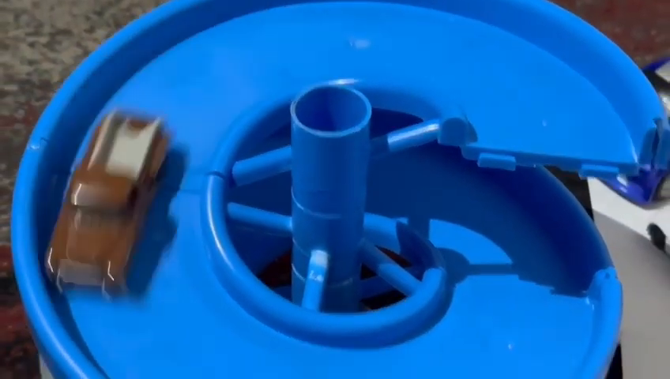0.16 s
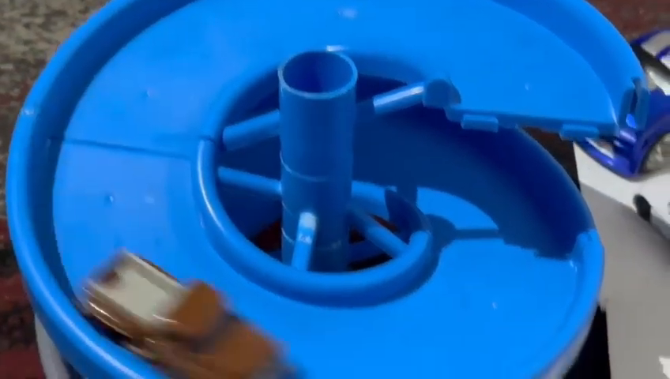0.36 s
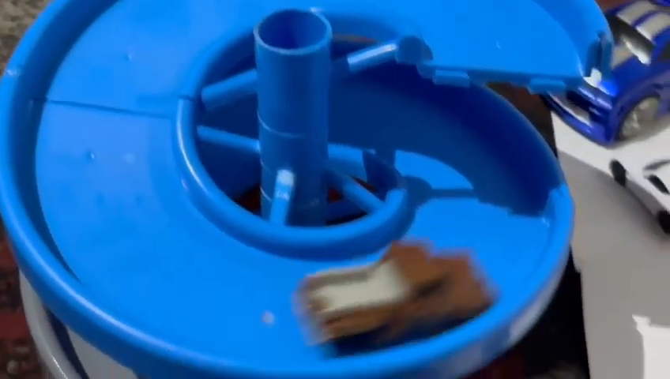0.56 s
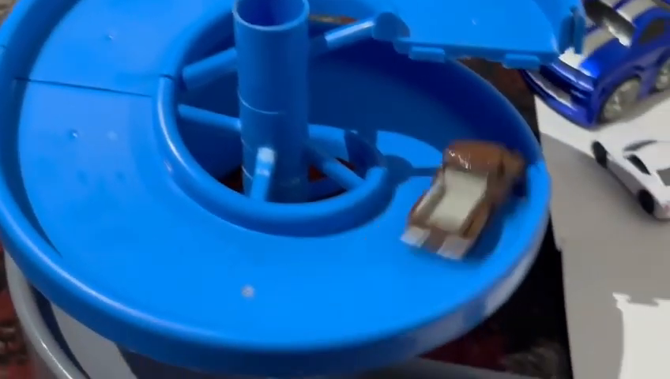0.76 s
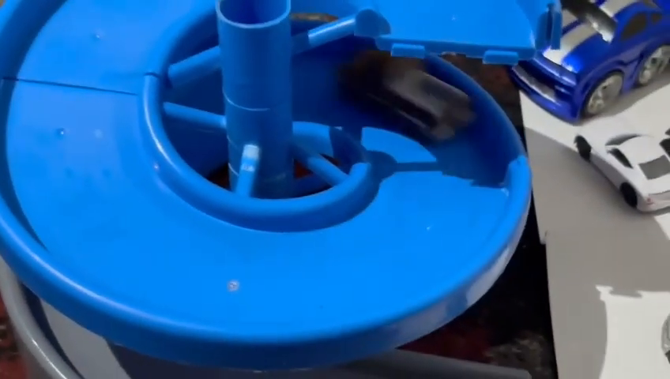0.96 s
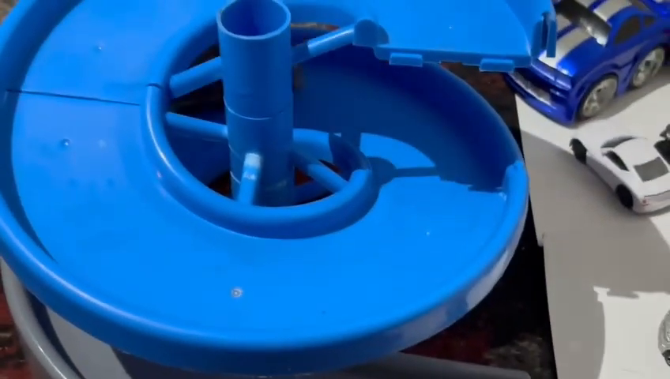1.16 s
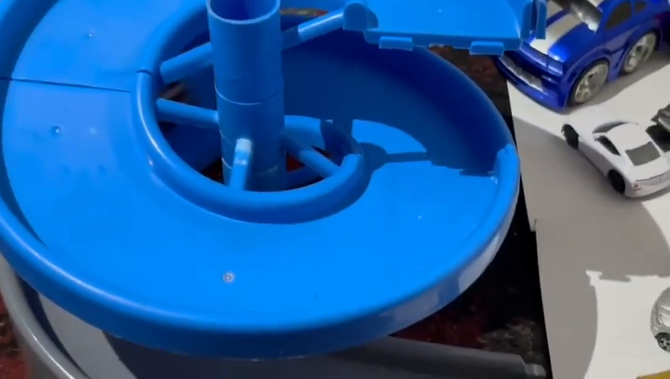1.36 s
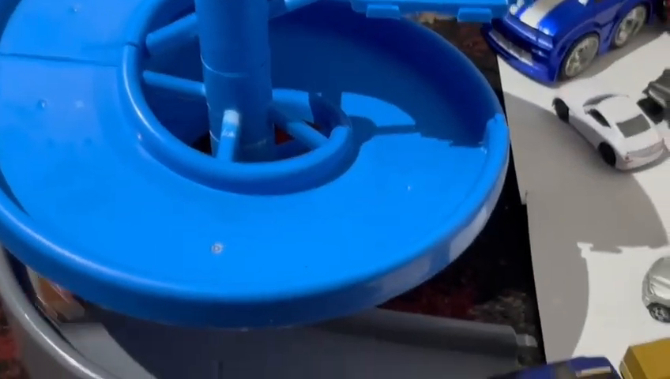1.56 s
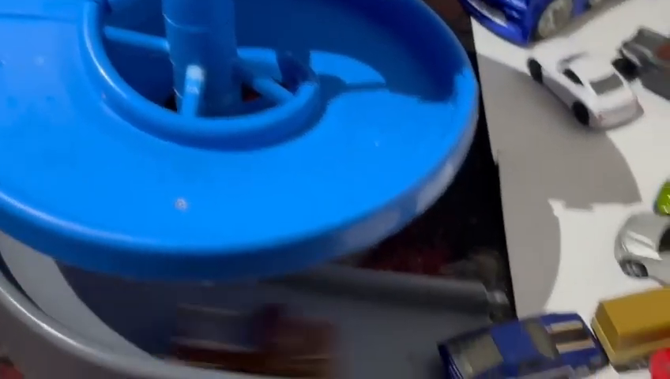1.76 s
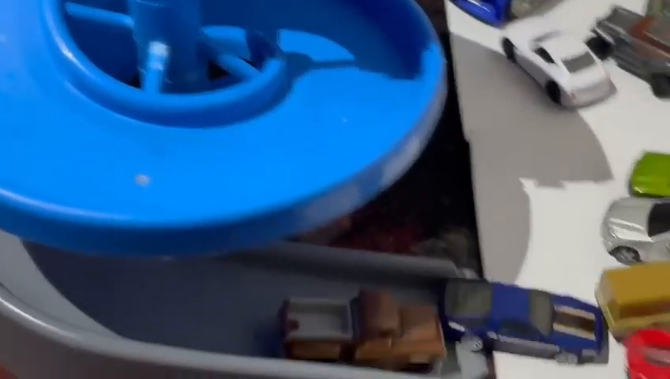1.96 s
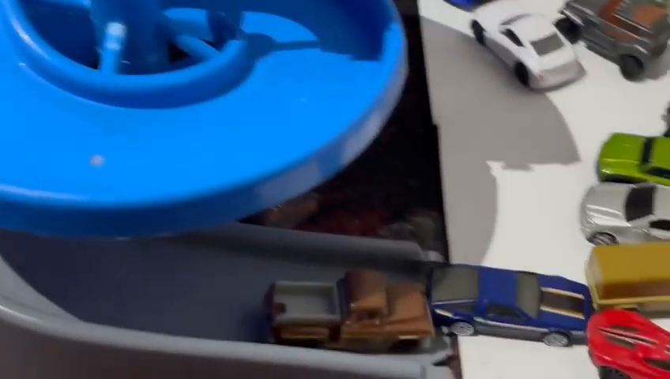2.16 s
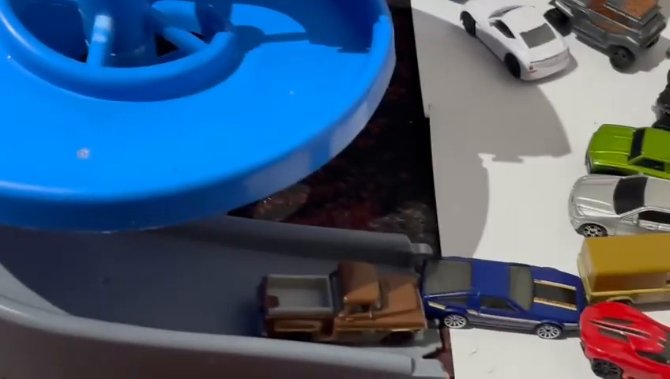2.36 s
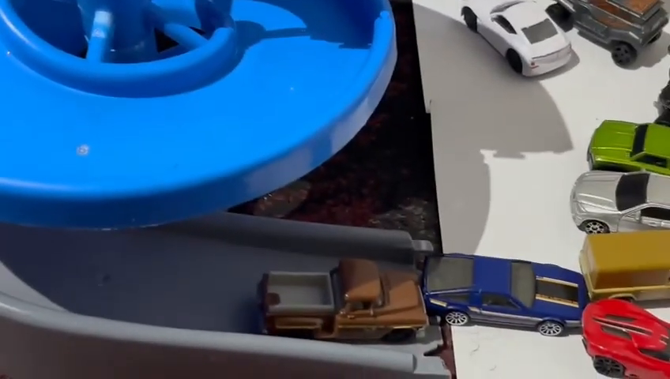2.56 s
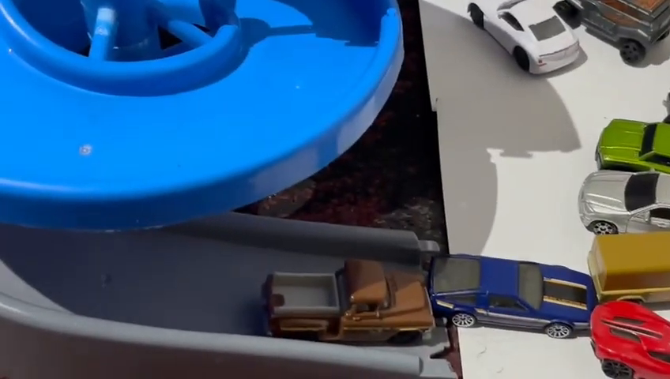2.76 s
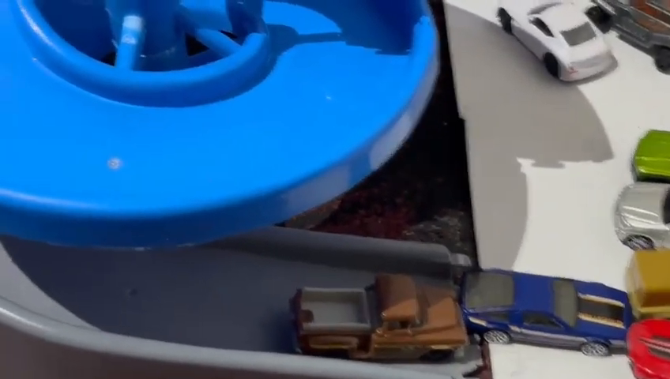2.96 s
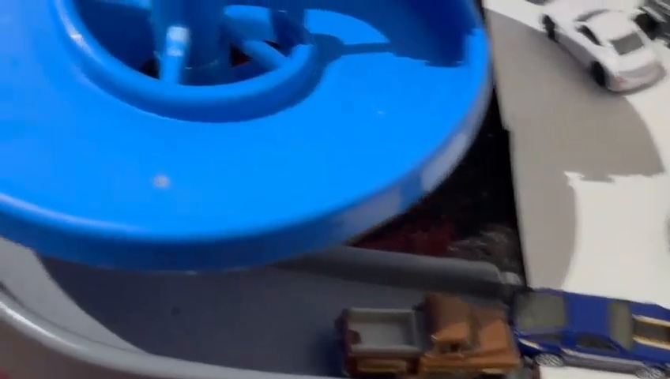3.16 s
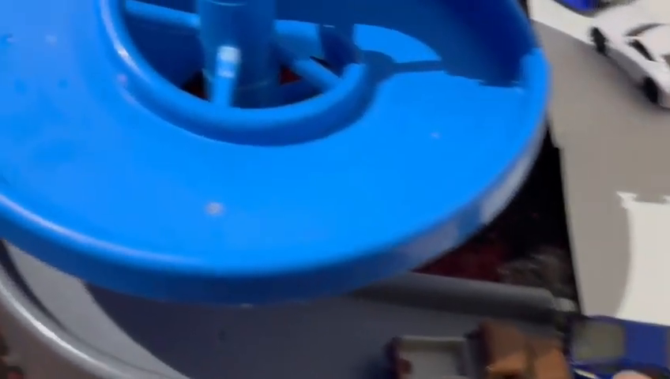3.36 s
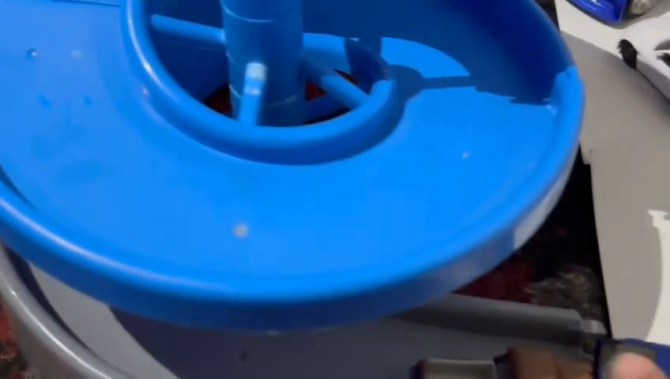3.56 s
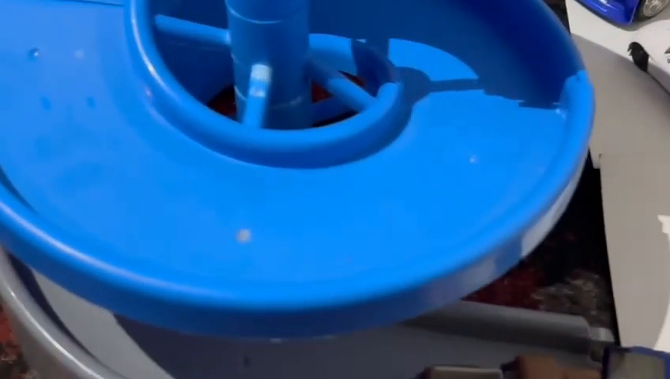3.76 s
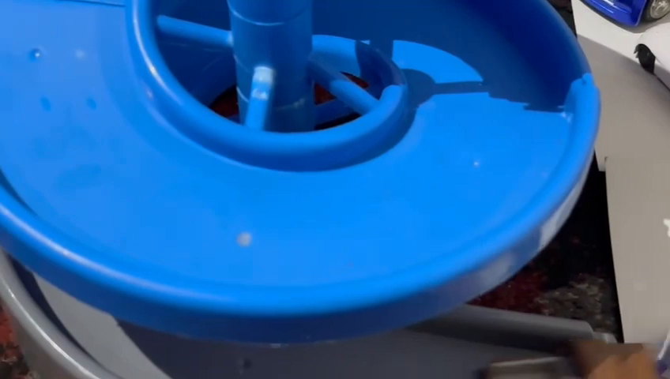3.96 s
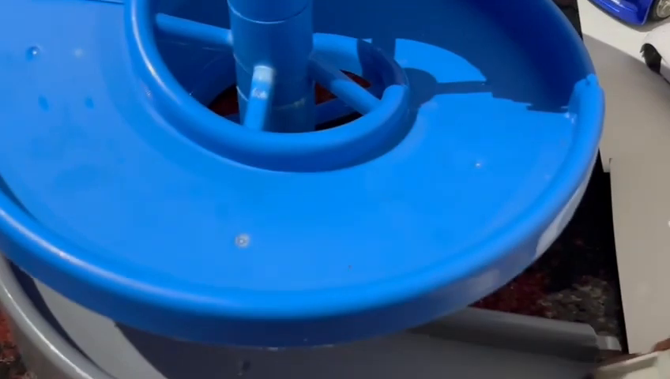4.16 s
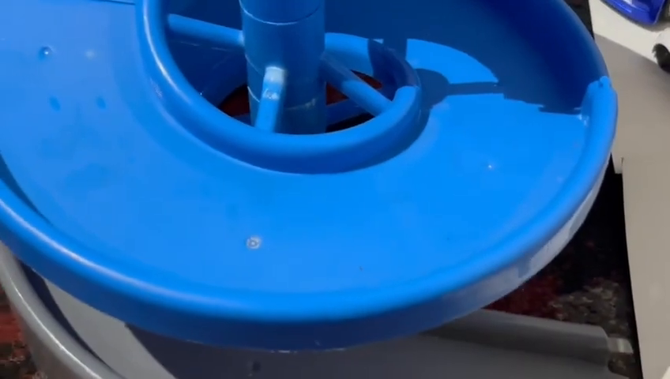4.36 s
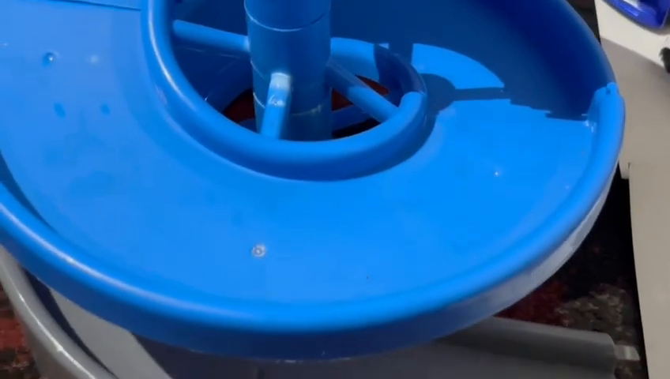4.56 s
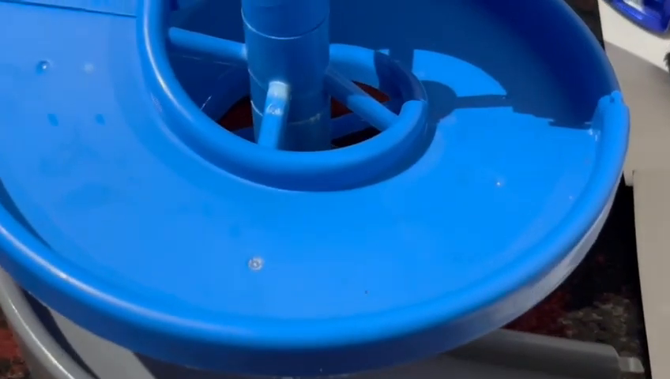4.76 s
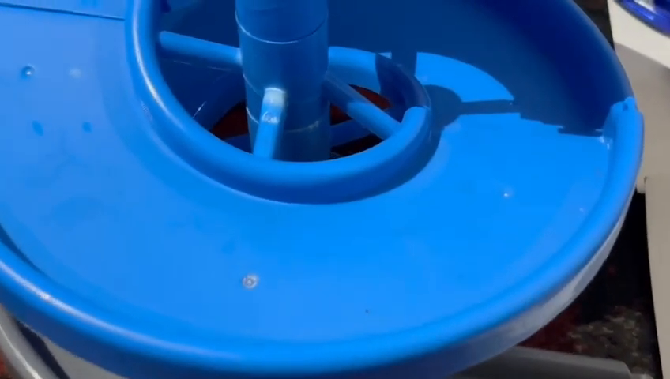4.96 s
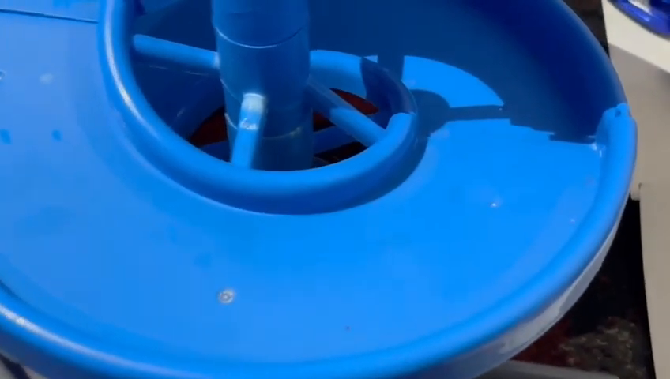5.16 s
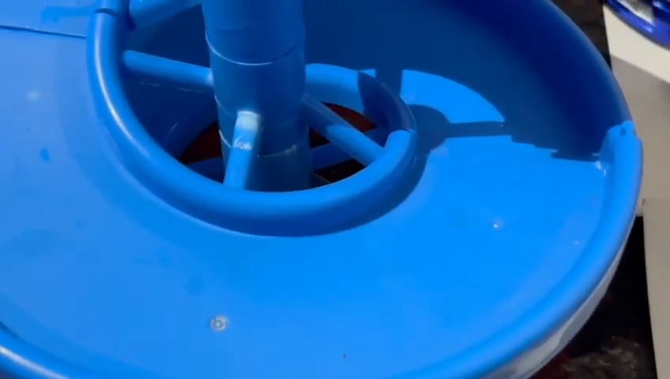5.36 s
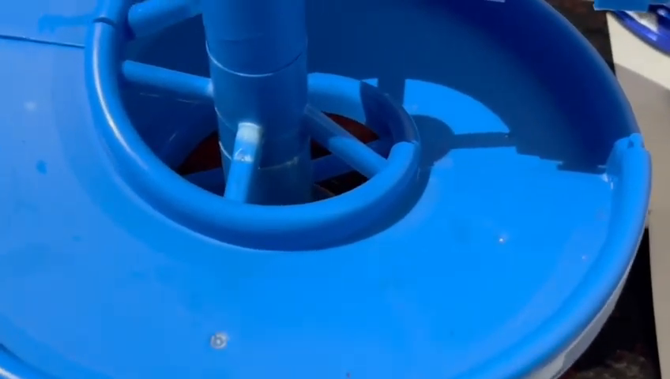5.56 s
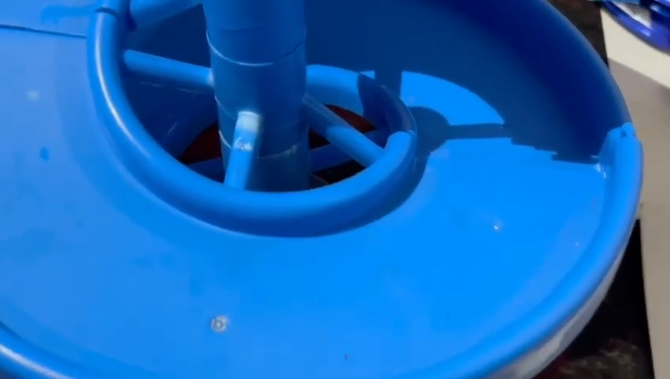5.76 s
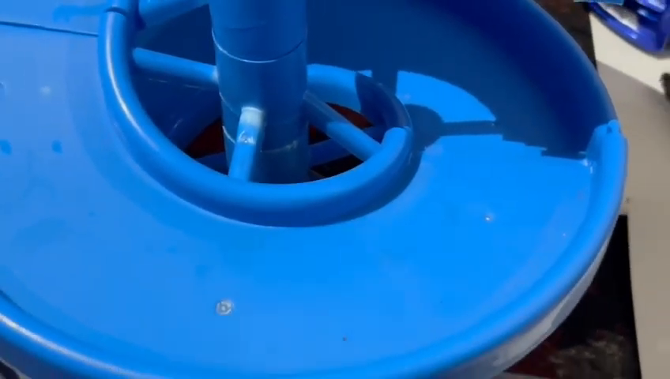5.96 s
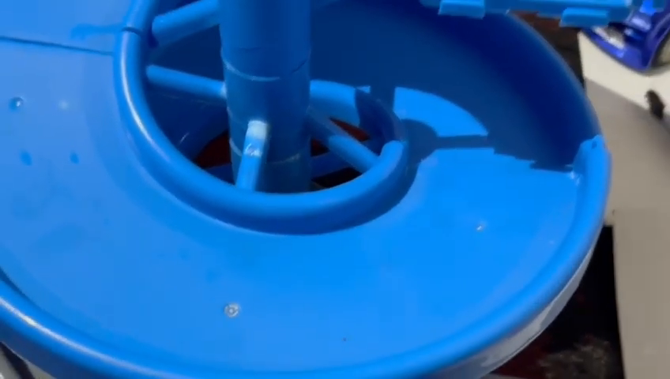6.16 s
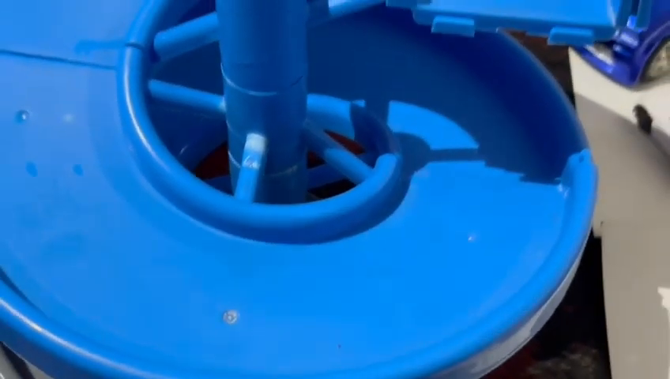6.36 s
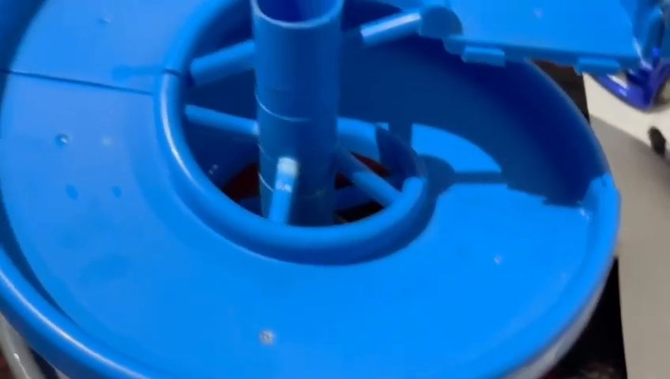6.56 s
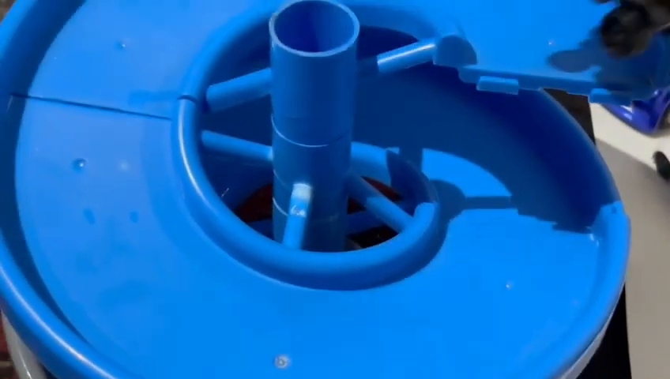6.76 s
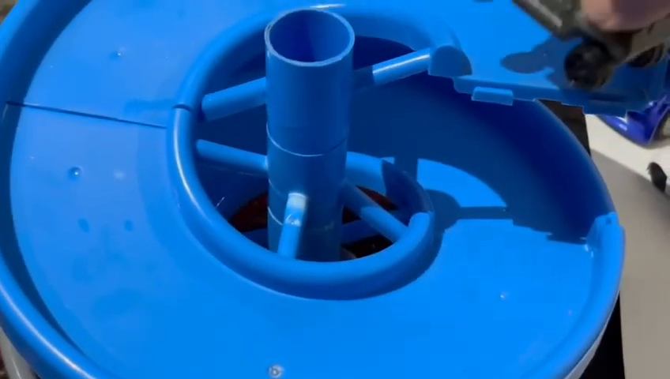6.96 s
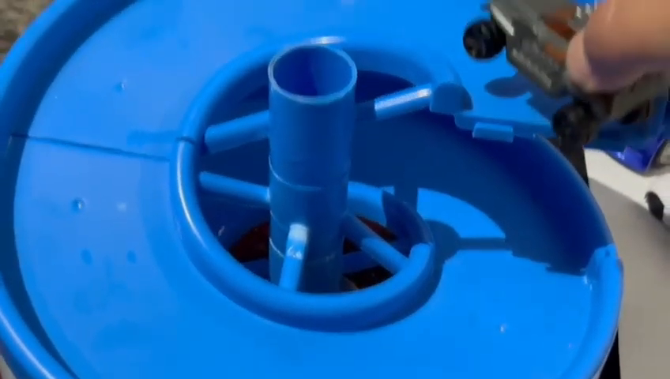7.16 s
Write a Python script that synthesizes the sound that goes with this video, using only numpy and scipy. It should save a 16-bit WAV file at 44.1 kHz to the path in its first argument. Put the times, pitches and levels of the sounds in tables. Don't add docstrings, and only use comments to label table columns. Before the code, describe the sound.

A small metal car is already rolling down a hollow plastic spiral, its wheels gritty and axles rattling, with boxy thumps at seams. It speeds up and hits parked cars with one loud crack, then settles. After quiet with faint sleeve rustle, a hand drags it away clattering, and later clinks other cars. Close microphones, quiet carpeted room.

```python
import sys
import numpy as np
from scipy import signal
from scipy.fft import rfft, irfft
from scipy.io import wavfile
from scipy.ndimage import uniform_filter1d

SR = 44100
rng = np.random.default_rng(int(sys.argv[2]) if len(sys.argv) > 2 else 0)


def volts(x):
    e = np.asarray(x, float) / 20
    return 10 ** e


def generate_wav(sig):
    pcm = np.round(np.clip(np.atleast_2d(sig).T, -1, 1) * 32767).astype(np.int16)
    wavfile.write(sys.argv[1], SR, pcm)


N = 321930


def evened(x):
    return x / np.sqrt(np.mean(x ** 2) + 1e-20)


def peaked(x):
    return x / abs(x).max()


def butter(x, order, hz, kind):
    return signal.sosfilt(signal.butter(order, hz, kind, fs=SR, output="sos"), x)


def read(points, hz):
    f, value = np.transpose(points)
    return np.interp(np.log(hz + 1), np.log(f + 1), value)


def add(mix, s, sound):
    part = mix[round(s * SR):][:len(sound)]
    part += sound[:len(part)]


def causal(points):
    db = read(points, abs(np.fft.fftfreq(4096, 1 / SR)))
    log_gain = np.log(volts(np.maximum(db, -100)))
    return np.fft.ifft(np.exp(np.conj(signal.hilbert(log_gain)))).real[:2048]


def colored(x, points):
    return signal.oaconvolve(x, causal(points))[:N]


def resonate(x, hz, width):
    r, w = np.exp(-np.pi * width / SR), 2 * np.pi * hz / SR
    gain = (1 - r) * np.sqrt(1 - 2 * r * np.cos(2 * w) + r * r)
    return signal.lfilter([gain], [1, -2 * r * np.cos(w), r * r], x)


def body(x, modes):
    return evened(sum(volts(db) * resonate(resonate(x, hz, width), hz, width) for hz, width, db in modes))


def grit(per_s, spread_db, smooth):
    size = volts(spread_db * np.minimum(rng.exponential(1, N), 3.5)) * (rng.random(N) < per_s / SR)
    noise = rng.standard_normal((2, N))
    return evened(size * np.sign(noise[0])) + smooth * noise[1]


def patchy(x, patch_db):
    z = signal.stft(x, SR, nperseg=512)[2]
    field = uniform_filter1d(rng.standard_normal(z.shape), size=8, axis=0)
    field = uniform_filter1d(field, size=9, axis=1)
    return evened(signal.istft(z * volts(patch_db * evened(field)), SR, nperseg=512)[1][:N])


# frequency in Hz, level in dB per Hz.
HUM = [(20, -26.5), (38, -7.5), (60, 2), (95, -2), (150, -17.5), (300, -13), (623, -24.5), (1600, -33),
       (5170, -52), (8300, -52), (10000, -67.5), (13300, -70)]


def room_tone():
    hz = np.fft.rfftfreq(N, 1 / SR)
    return volts(-67.5) * evened(irfft(rfft(rng.standard_normal(N)) * volts(read(HUM, hz)), N))


def columns(tables):
    t = np.arange(N) / SR
    s, *values = np.concatenate(tables).T
    on = sum((t >= rows[0][0]) & (t <= rows[-1][0]) for rows in tables)
    return uniform_filter1d(on * 1., size=1323, mode="nearest"), [np.interp(t, s, v) for v in values]


# time in seconds, force in dB, weight on the ramp in dB.
RUN_DOWN = [
    (0.0, -35, 0),
    (0.15, -37, -6),
    (0.33, -38, -1.5),
    (0.53, -42, 0),
    (0.714, -38, -4),
    (0.918, -33.5, -6),
    (1.164, -39.5, -0.5),
    (1.408, -37.5, -2.5),
    (1.5, -33.5, -10.5),
]
RUN_OUT = [
    (1.501, -37, -16),
    (1.56, -31.5, -6.5),
    (1.78, -26.5, -9.5),
    (1.84, -22, -12),
    (1.872, -29, -3),
    (1.95, -42, 0),
    (2.04, -58.5, 2.5),
    (2.14, -62.5, 12),
    (2.25, -94, 4),
]
DRAG = [
    (3.765, -84, 0),
    (3.795, -46, -2),
    (3.86, -46.5, -0.5),
    (3.921, -40, 4),
    (3.97, -43.5, 1.5),
    (4.059, -46, -1),
    (4.1, -40.5, -8),
]
LIFT = [
    (4.1, -36.5, -6.5),
    (4.18, -47, 3.5),
    (4.24, -45.5, -5.5),
    (4.31, -39, -5.5),
    (4.39, -43.5, -8),
    (4.43, -58, -1),
    (4.501, -74, 14),
]
PICK_UP = [
    (5.39, -86.5, 12.5),
    (5.44, -68.5, 4),
    (5.53, -64.5, 0),
    (5.64, -64.5, 2.5),
    (5.72, -55, 3),
    (5.81, -70, 8.5),
    (5.88, -50, -14),
    (5.96, -64.5, -3),
    (6.05, -76.5, -0.5),
]
SET_DOWN = [
    (7.01, -97, -0.5),
    (7.041, -90, -10.5),
    (7.109, -76.5, 3.5),
    (7.17, -97.5, 10.5),
    (7.21, -78.5, 5),
    (7.3, -75, -1),
]
# hollow against plate in dB, brightness in dB, floor shake in dB.
FOOTING = [
    (-3, -0.5, -7),
    (-4, 4, -5),
    (-1.5, 0, 7),
    (-7.5, 2.5, 12),
    (-6, 3, 11),
    (10.5, 2, 11),
]


def movements():
    tables = [RUN_DOWN, RUN_OUT, DRAG, LIFT, PICK_UP, SET_DOWN]
    return columns([[row + footing for row in rows] for rows, footing in zip(tables, FOOTING)])


# frequency in Hz, level in dB per Hz.
SHUDDER = [(40, -31.5), (90, -5.5), (130, 4), (250, -3), (380, -31)]


def shudder():
    on, (force_db, *_, shake_db) = movements()
    shake = on * volts(-38.5 + 0.69 * force_db + shake_db)
    level = uniform_filter1d(shake, round(0.2 * SR)) + volts(-80.5)
    return level * evened(colored(rng.standard_normal(N), SHUDDER))


# frequency in Hz, level in dB per Hz.
AXLES = [(760, -26), (1300, 0.5), (1740, -4.5), (2570, 1), (5170, -8.5), (5810, -15), (8320, -16.5),
         (9600, -42), (11500, -23.5), (12300, -36), (13300, -76.5)]
# frequency in Hz, width in Hz, level in dB.
SHELL = [(2610, 720, -5.5), (3125, 79, -3.5), (3900, 92, -6.5), (5260, 220, -10.5)]
# frequency in Hz, width in Hz, level in dB.
PLATE = [(876.3, 320, 3.5), (967.3, 170, 3), (1198, 150, 5.5), (1500, 490, 2)]
# frequency in Hz, width in Hz, level in dB.
HOLLOW = [(318, 38, -4.5), (429, 82, -2.5), (476, 100, 3), (629, 91, -7)]


def rolling():
    on, (force_db, weight_db, hollow_db, bright_db, _) = movements()
    cover = np.exp(-((np.arange(N) / SR - 1.25) / 0.29) ** 2)
    fine = grit(1000, spread_db=3.0, smooth=0.87)
    coarse = grit(400, spread_db=3.5, smooth=0.85)
    axles = evened(colored(fine, AXLES)) + 0.17 * body(fine, SHELL)
    axles = patchy(axles, patch_db=2.1)
    axles = axles + (volts(bright_db - 7.5 * cover) - 1) * butter(axles, 2, 3200, "high")
    plate = patchy(body(coarse + 0.57 * fine, PLATE), patch_db=2.07)
    ramp = plate + volts(hollow_db + 0.5 - 9 * cover) * body(coarse, HOLLOW)
    return on * volts(force_db) * (axles + volts(weight_db + 0.5 + 4.5 * cover) * ramp)


# time in seconds, peak in dB, pitch in Hz.
THUMPS = [(0.019, -30, 468), (0.027, -28, 500), (0.045, -17, 500), (0.06, -27, 500), (0.202, -30, 400),
          (0.274, -31, 794), (0.328, -30, 1150), (0.36, -31, 802), (0.464, -34, 479), (0.591, -32, 813),
          (0.765, -25, 1020), (0.794, -29, 510), (0.892, -28, 510), (0.92, -30, 850), (1.06, -33, 1140),
          (1.185, -31, 552), (1.2, -28, 902), (1.366, -30, 1140), (2.14, -45, 520), (3.833, -39, 480),
          (4.02, -38, 470), (4.04, -40, 470), (4.06, -38, 480), (5.51, -51, 800), (5.575, -45, 850),
          (5.887, -46, 1280), (7.125, -62, 500), (7.221, -59, 600), (0.082, -25.5, 500), (0.153, -19, 467),
          (0.179, -26.5, 460), (0.311, -29, 416), (0.424, -40, 400), (0.482, -31, 430), (0.544, -29, 487),
          (0.726, -23, 488), (0.727, -27, 900), (0.78, -21.5, 522), (0.839, -31, 497), (0.881, -21.5, 512),
          (1.41, -20, 480), (1.533, -21.5, 423), (1.637, -28, 430), (1.639, -22, 900), (1.93, -30.5, 450),
          (6.711, -52, 290), (6.728, -60, 200), (7.109, -57, 600)]
# time in seconds, peak in dB, pitch in Hz.
LANDINGS = [
    (1.849, -12.5, 414.4),
    (1.988, -38, 453),
    (2.106, -46, 670),
    (3.821, -37, 482),
    (3.917, -42, 464),
    (4.082, -29, 464),
    (7.234, -49, 480),
]


def thumps():
    out, t = np.zeros(N), np.arange(5000) / SR
    wheel_cycles, car_cycles = 4.8, 7.5
    sag, sag_cycles = .4, .4
    blows = [row + (wheel_cycles,) for row in THUMPS] + [row + (car_cycles,) for row in LANDINGS]
    for s, db, hz, cycles in blows:
        press = np.sqrt(np.sin(np.pi * np.minimum(t * hz / cycles, 1) ** .7).clip(0))
        turns = hz * t + sag * sag_cycles * (1 - np.exp(-hz * t / sag_cycles))
        blow = press * np.sin(2 * np.pi * turns)
        ring = np.sin(2 * np.pi * hz * .95 * t) - .5 * np.sin(2 * np.pi * hz * 1.05 * t)
        add(out, s - .0002, volts(db) * peaked(blow + 0.52 * ring * volts(-60 * t / 0.086)))
    return out


# frequency in Hz, level in dB per Hz.
CRACK = [(760, -23.5), (1300, -4), (2200, -2.5), (3310, 2), (4560, -2), (6400, -3), (8570, -10.5),
         (9720, -32.5), (11400, -19), (13300, -39.5)]
# time in seconds, peak in dB, ringing pitch in Hz,
# share passed to the ramp in dB, metal edge in dB (0 if left out).
TICKS = [(0.046, -34, 1500, 6), (0.11, -32, 1930, -9), (0.1484, -24.5, 1920, -7), (0.174, -33, 2850, -1),
         (0.3114, -30, 1840, 4), (0.589, -35.5, 1500, 15.5), (0.7265, -30, 1100, -2),
         (0.8533, -17, 3300, -6), (1.1997, -27.5, 2540, 1), (1.408, -28.5, 2426, 5.5),
         (1.4303, -23, 4620, -5.5), (1.5325, -14.5, 2547, 1), (1.8468, -3.5, 3708, -10),
         (1.8774, -20.5, 1770, -20), (2.0777, -41.5, 3020, -15), (2.0986, -37.5, 1790, 6.5),
         (2.1064, -30.5, 2650, -5.5), (2.126, -38, 1990, -3, -3), (2.132, -38, 3000, -3, 0),
         (2.084, -41, 3700, -15, 0), (0.8665, -27, 3900, -15, 0), (7.2328, -35, 3140, -9)]
KNOCKS = [(0.0505, -19, 1500, -2.5), (0.0666, -19.5, 1520, -3.5), (0.0824, -16.5, 2200, -8),
          (0.163, -20, 3510, -11), (0.7634, -13, 3250, -12, 6), (0.8136, -18.5, 3000, -7),
          (1.4467, -19.5, 2640, -12), (1.5846, -18, 2370, -4), (1.6385, -20, 3110, 1),
          (1.8632, -21.5, 1710, 2.5), (1.929, -20, 2918, -8, 10), (1.935, -22, 3000, 0, 10),
          (1.987, -33, 2520, -0.5), (2.2506, -52, 2500, -3, 10), (2.2555, -52, 2300, -3, 14),
          (0.131, -26, 2800, -8), (0.238, -24, 2800, -10), (0.826, -21, 2900, -15),
          (4.361, -27, 2410, -4.5), (4.716, -51.5, 2160, -8), (4.797, -40.5, 1673, -9),
          (5.5745, -50, 2100, 3), (5.664, -38, 1560, -7), (7.0863, -56, 2400, 0), (7.094, -60, 2000, 0),
          (7.2065, -59, 3600, -8), (7.11, -62, 3000, 0), (7.028, -70, 4500, -20, 15),
          (7.05, -68, 4800, -20, 10), (7.249, -49, 3100, -6, 14)]
JOSTLES = [(3.7845, -46, 2480, -10, -8), (3.7958, -35, 1640, -20, -6), (3.8187, -44, 1140, 1, -10),
           (3.852, -38, 3400, -8, -10), (3.8801, -37, 2700, 0, -10), (3.8916, -31, 2300, -3, -10),
           (3.904, -28, 1250, -6, -3), (3.919, -24.5, 2570, -1.5, -8), (3.934, -22.5, 1230, -4, -1),
           (3.987, -38, 3000, -10, 2), (4.0176, -31, 4300, -21, -2), (4.0477, -35, 2600, 0, -8),
           (4.0757, -12.5, 2500, -25, 0), (4.097, -23, 3900, -8, 0), (4.142, -16, 3860, -20, -2),
           (4.153, -18.5, 4220, -12, 0), (4.2008, -25, 2030, -15, 0), (4.234, -31, 2700, -25, -10),
           (4.2484, -30, 2890, -7, -10), (4.2595, -32, 1540, 6.5, -8), (4.2885, -23, 2340, -23, -3),
           (4.2935, -28, 5000, -20, 2), (4.3076, -24, 2450, -23, -4), (4.318, -28, 2600, -15, -8),
           (4.3294, -25.5, 2395, -7.5, 0), (4.3794, -28.5, 2470, -7, 2), (4.3985, -23, 2530, -23, 0)]
CLINKS = [(5.4465, -37, 3130, -7, 0), (5.451, -42, 3100, -10, -6), (5.4628, -38, 2900, -15, -2),
          (5.51, -56, 1900, 8, -15), (5.5175, -52, 6500, -10, 4), (5.552, -52, 2050, -6, -12),
          (5.564, -44, 5800, -18, 2), (5.6655, -42, 3100, -8, -2), (5.67, -44, 3100, -4, -4),
          (5.677, -38.5, 5150, -10, 0), (5.733, -46, 4000, -10, 0), (5.7395, -38, 2500, -3, -8),
          (5.7445, -28, 3300, -18, 0), (5.7682, -36.5, 5300, -8, -3), (5.8255, -33, 4400, -30, 0),
          (5.8285, -26, 2420, -39, 0), (5.845, -42, 3000, -20, 0), (5.7, -50, 2600, -10, 0),
          (5.6, -56, 3500, -10, 0), (5.91, -48, 4200, -20, 0), (5.8637, -39, 2340, -16, -8),
          (5.871, -43, 4700, -16, 0), (5.8855, -37, 4200, -14, 0), (5.9506, -54, 2090, -10, 0),
          (6.4905, -67, 2260, -17, 0)]
# treble against the peak in dB, contact in ms, rise in ms.
HARDNESS = [
    (-6, 8.4, .4),
    (-26.5, 3.5, .3),
    (-5, 5.44, .9),
    (-3.5, 3.6, 2.2),
]


def clacks():
    out, t, crack = np.zeros(N), np.arange(2000) / SR, causal(CRACK)
    t_ms = t * 1000
    kinds = zip([TICKS, KNOCKS, JOSTLES, CLINKS], HARDNESS)
    hits = [(row + (0,))[:5] + kind for rows, kind in kinds for row in rows]
    noises = rng.standard_normal((len(hits), len(t)))
    for (s, db, hz, ramp_db, edge_db, top_db, ms, rise_ms), noise in zip(hits, noises):
        contact_ms = (ms * volts(0.44 * (db + 29.5))).clip(4, 9)
        rise = 1 - np.exp(-(t_ms / max(rise_ms, .1)) ** 2)
        fall = 1.5 * np.exp(-t_ms / 1.1) + np.exp(-t_ms / contact_ms) + .06 * np.exp(-t / .015)
        drive = noise * rise * fall
        burst = signal.oaconvolve(drive, crack)[:len(t)]
        top = butter(burst, 3, 5000, "high")
        middle = evened(butter(burst, 3, 5000, "low"))
        neighbour_hz = hz * 2.0 ** np.tanh(noise[0])
        middle = middle + 1.2 * evened(resonate(drive, hz, 210))
        middle = middle + .4 * evened(resonate(drive, neighbour_hz, 210))
        ramp = volts(ramp_db) * peaked(body(drive, PLATE))
        clack = peaked(middle) + volts(top_db + edge_db) * peaked(top) + ramp
        add(out, s - .0005 - rise_ms / 1000, volts(db) * clack)
    return out


# time in seconds, peak in dB, pitch in Hz,
# seconds to die away by 60 dB.
RINGS = [(2.109, -31, 2994, 0.046), (2.106, -32, 1660, 0.042), (2.106, -62, 5300, 0.12),
         (2.251, -48, 1555, 0.075), (2.252, -52, 2950, 0.044), (2.251, -52, 2265, 0.04),
         (5.864, -42.5, 2345, 0.15), (5.744, -15.5, 5600, 0.012), (0.163, -27, 3560, 0.023),
         (0.763, -15.5, 3080, 0.017), (4.795, -53.5, 1590, 0.065), (2.11, -53, 3040, .28),
         (5.828, -27, 2420, .05), (7.2325, -43, 3200, .03), (2.107, -40, 1000, .05),
         (2.251, -56, 2536, .05), (2.251, -69, 8400, .04), (4.0757, -20, 5350, .025),
         (4.0757, -24, 1200, .05), (4.0757, -24, 3850, .04), (5.827, -36, 4400, .04),
         (7.233, -50, 4700, .03), (7.233, -56, 1165, .08)]


def rings():
    out, t = np.zeros(N), np.arange(12000) / SR
    for s, db, hz, t60 in RINGS:
        pair = np.sin(2 * np.pi * hz * t) + .5 * np.sin(2 * np.pi * hz * 1.015 * t)
        add(out, s, volts(db - 60 * t / t60) * (1 - np.exp(-t / 0.00072)) * pair)
    return out


# time in seconds, peak in dB, pitch in Hz,
# length in seconds.
CREAKS = [(2.588, -52, 1036, 0.08), (2.726, -70, 6100, .04), (3.326, -60.5, 1280, .04),
          (4.456, -36.5, 3350, 0.022), (4.453, -48, 7200, 0.026), (6.007, -57.5, 1110, 0.097),
          (7.104, -70, 7200, 0.02), (7.116, -71, 7300, .05), (7.1, -72, 3000, .08), (7.02, -74, 4900, .08),
          (2.39, -82, 4500, .012), (.812, -28, 2900, .04), (.935, -30, 2350, .07), (1.055, -28, 2550, .04),
          (1.24, -27, 1150, .09), (1.33, -32, 2650, .05), (.22, -29, 2100, .06), (6.705, -56, 130, 0.09)]


def creaks():
    out = np.zeros(N)
    for (s, db, hz, length), noise in zip(CREAKS, rng.standard_normal((len(CREAKS), 8000))):
        u = np.arange(len(noise)) / SR / length
        narrow = resonate(resonate(noise, hz, 0.13 * hz), hz, 0.13 * hz)
        add(out, s, volts(db) * peaked(narrow * u * np.exp(-(u / .55) ** 2)))
    return out


# frequency in Hz, level in dB per Hz.
CLOTH = [(240, -2), (400, -4), (1290, -3), (3200, -1), (4800, -4), (8300, -11.5), (9500, -24.5),
         (11500, -16.5), (13300, -79)]
# start in seconds, end in seconds, rustle in dB.
STROKES = [
    (2.889, 3.0, -67),
    (3.05, 3.382, -69.5),
    (3.53, 3.801, -69),
    (4.527, 4.602, -71),
    (4.636, 4.808, -68.5),
    (5.95, 6.092, -81),
    (7.05, 7.12, -90),
    (7.25, 7.3, -80),
]


def sleeve():
    t = np.arange(N) / SR
    on_db_per_s, off_db_per_s, rest_db = 252, 70.5, -89
    strokes = [db - on_db_per_s * (start - t).clip(0) - off_db_per_s * (t - end).clip(0)
               for start, end, db in STROKES]
    level = volts(np.max(strokes, axis=0)) + volts(rest_db)
    return level * patchy(colored(grit(3000, spread_db=2.5, smooth=1.5), CLOTH), patch_db=1.0)


# frequency in Hz, seconds to die away by 60 dB.
ROOM = [(125, 0.36), (500, 0.25), (2000, 0.32), (8000, 0.23)]


def reverb(x):
    taps = np.zeros((2, SR))
    at = np.arange(300, SR - 20, 20) + rng.integers(0, 20, (2, (SR - 301) // 20))
    np.put_along_axis(taps, at, rng.choice([-1., 1.], at.shape), 1)
    hz, t, z = signal.stft(taps, SR, nperseg=256)
    tail = signal.istft(z * volts(-60 * t / read(ROOM, hz)[:, None]), SR, nperseg=256)[1]
    tail = tail[0] + 0.13 * tail[1] * np.array([[1], [-1]])
    return signal.fftconvolve(x[None], tail / np.linalg.norm(tail[0]), axes=1)[:, :N]


def scene():
    cars = butter(rolling() + clacks(), 3, 209.2, "high")
    near = cars + thumps() + sleeve()
    small = rings() + creaks()
    wet = volts(-13.0) * reverb(near + .35 * small)
    return (near + small) * volts(np.array([[.3], [-.3]])) + wet + room_tone() + shudder()


def top_cut(x):
    return signal.sosfilt(signal.butter(12, 13420, fs=SR, output="sos"), x)


# frequency in Hz, side against middle in dB.
WIDTH = [(40, -16.5), (150, -3.5), (350, -12.5), (700, -7.5), (1400, -7.5), (2800, -12.5), (7800, -11),
         (8600, 5.5), (9700, 18.5), (11000, 9), (12000, -11.5)]
# 0 for middle or 1 for side, from Hz, to Hz,
# rise in treble needed to pass in dB.
STARVED = [(0, 8300, 8700, -2.5), (0, 8700, 9100, 0.0), (0, 9100, 10500, 4.5), (0, 10500, 11000, 3.0),
           (0, 11000, 11400, -3.0), (0, 11400, 11900, 0.6), (0, 11900, 14000, 9.0), (1, 1900, 2500, 0.5),
           (1, 2500, 3300, 2.5), (1, 3300, 4400, 6.0), (1, 4400, 7600, 5.0), (1, 7600, 8200, 1.5),
           (1, 8200, 8800, -1.0), (1, 10300, 11000, -2.5), (1, 11000, 11700, -0.5), (1, 11700, 14000, 7.0)]


def record(dry):
    hz, _, z = signal.stft(dry, SR, nperseg=1024, noverlap=768)
    mid = z.mean(0)
    scatter = volts(read(WIDTH, hz))[:, None] * np.exp(2j * np.pi * rng.random(mid.shape))
    pair = np.array([mid, (z[0] - z[1]) / 2 + scatter * mid])
    power = abs(mid) ** 2
    top_db = 10 * np.log10(power[hz > 6000].sum(0) + 1e-16)
    rise_db = top_db - uniform_filter1d(top_db, size=17)
    share_db = uniform_filter1d(top_db - 10 * np.log10(power.sum(0) + 1e-16), size=17)
    lucks = rng.standard_normal((len(STARVED), mid.shape[1] // 4 + 1))
    for (part, lo, hi, need_db), luck in zip(STARVED, lucks):
        bright_db = (part == 0 and need_db > 2) * .35 * (share_db + 16)
        passed = rise_db + bright_db + 1.6 * np.repeat(luck, 4)[:len(rise_db)] > need_db
        pair[part, (hz >= lo) & (hz < hi)] *= uniform_filter1d(passed * 1., size=2) > 0
    sides = [pair[0] + pair[1], pair[0] - pair[1]]
    wide = signal.istft(sides, SR, nperseg=1024, noverlap=768)[1][:, :N]
    wide = butter(wide, 3, 40, "high")
    edge = signal.firwin(255, 12500, window=("kaiser", 9), fs=SR)
    cut = signal.oaconvolve(wide, edge[None], "same")
    return top_cut(cut)


dry = scene()
out = record(dry)
generate_wav(out)
```